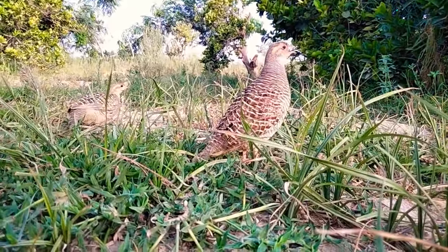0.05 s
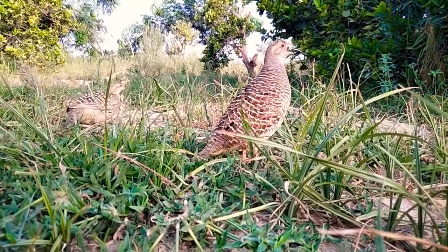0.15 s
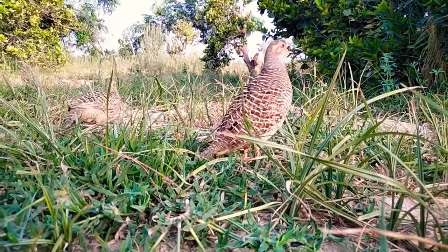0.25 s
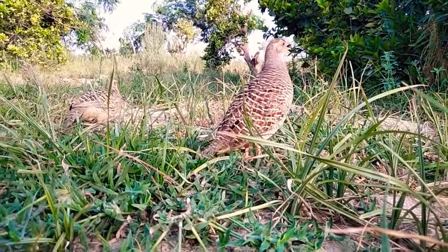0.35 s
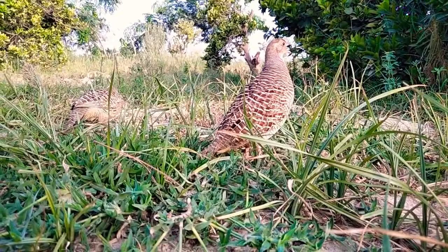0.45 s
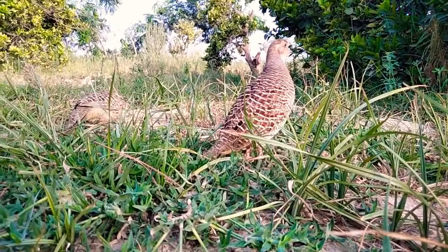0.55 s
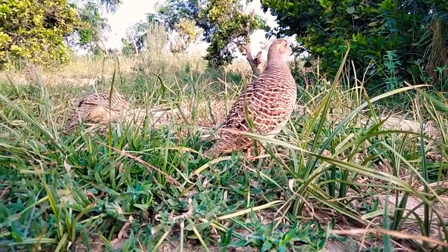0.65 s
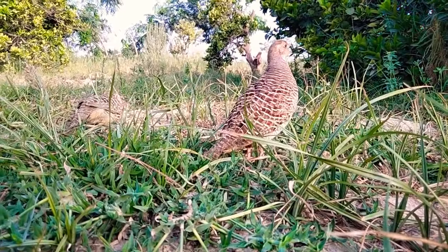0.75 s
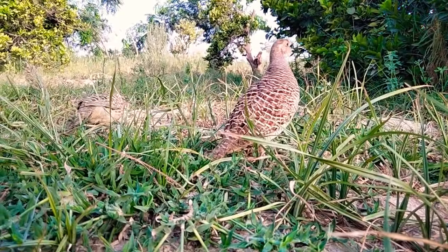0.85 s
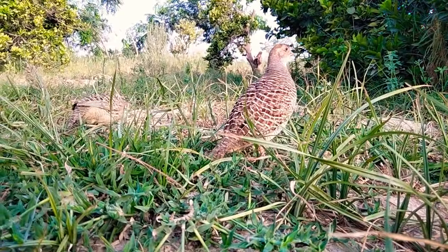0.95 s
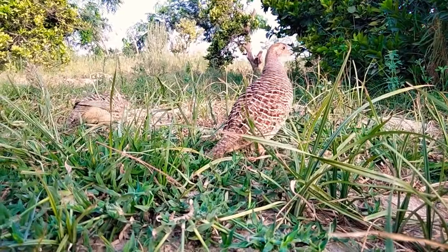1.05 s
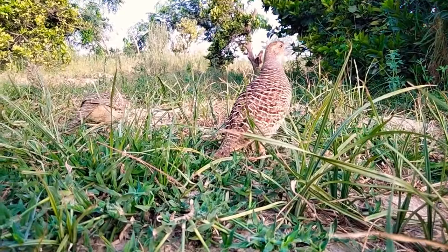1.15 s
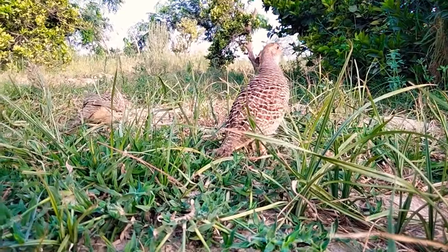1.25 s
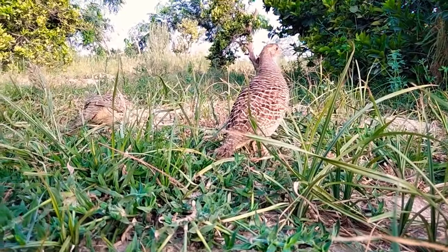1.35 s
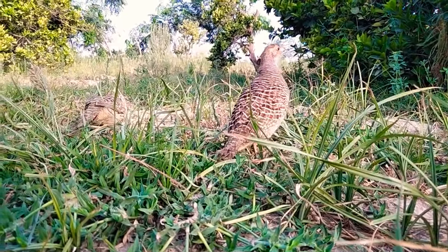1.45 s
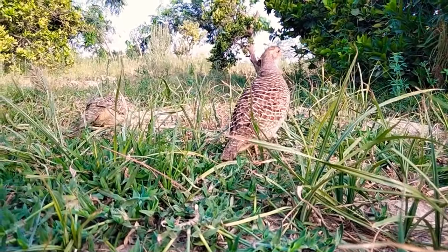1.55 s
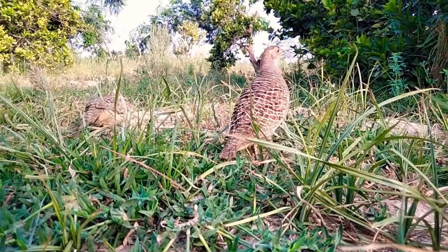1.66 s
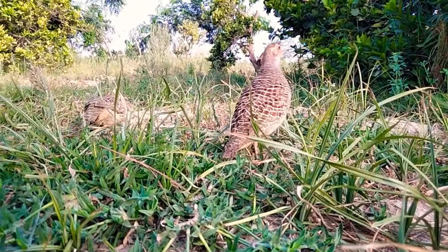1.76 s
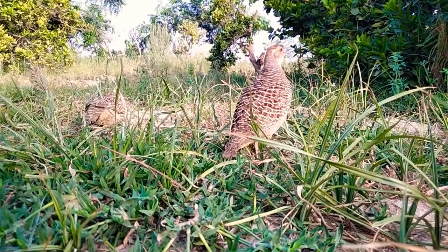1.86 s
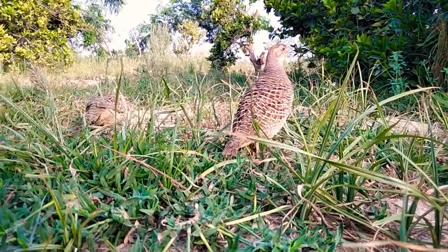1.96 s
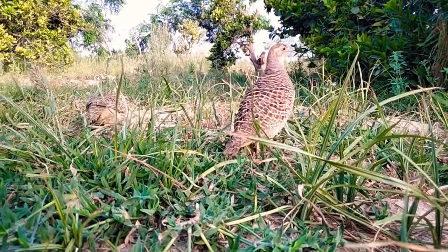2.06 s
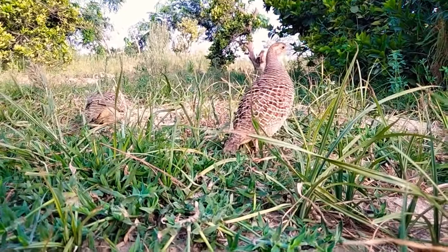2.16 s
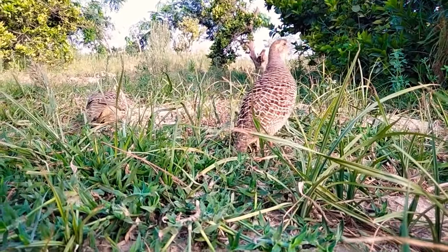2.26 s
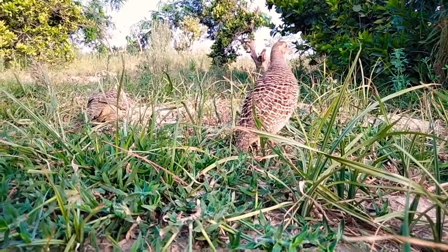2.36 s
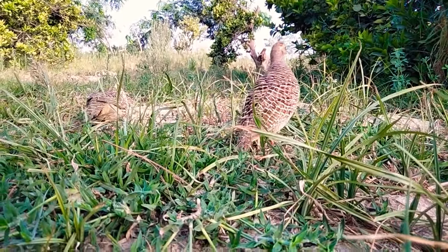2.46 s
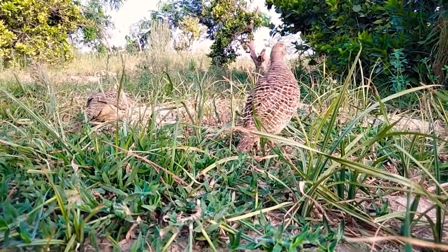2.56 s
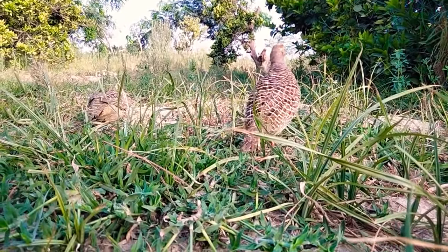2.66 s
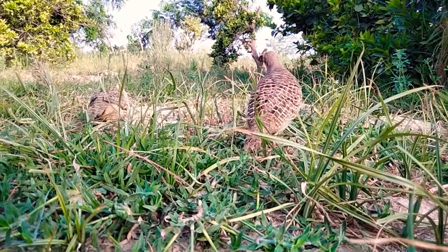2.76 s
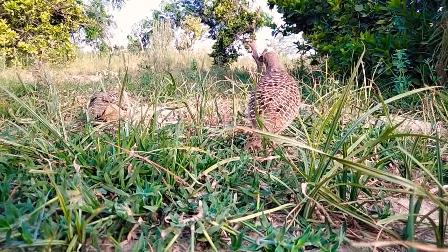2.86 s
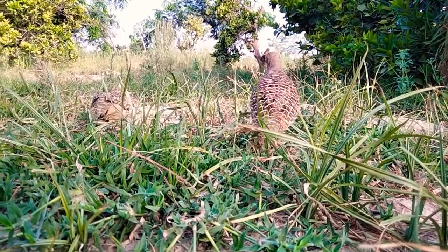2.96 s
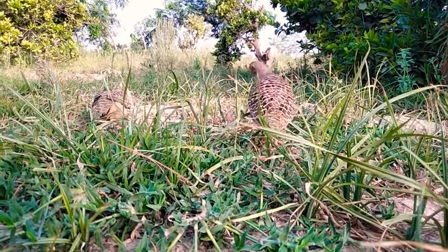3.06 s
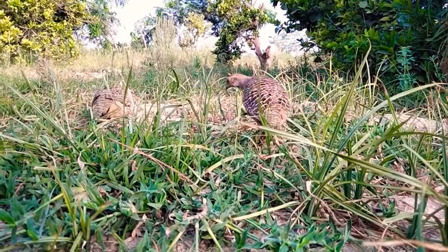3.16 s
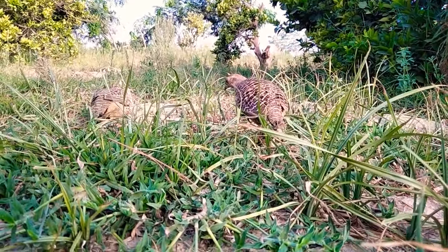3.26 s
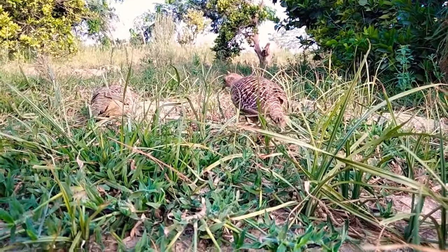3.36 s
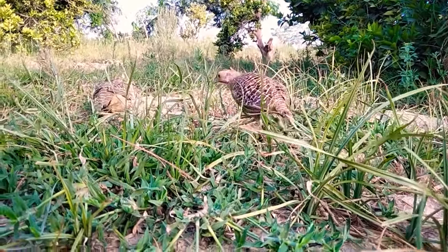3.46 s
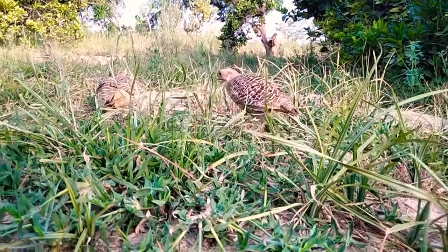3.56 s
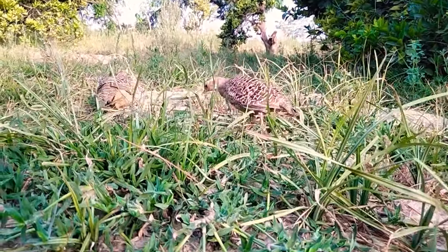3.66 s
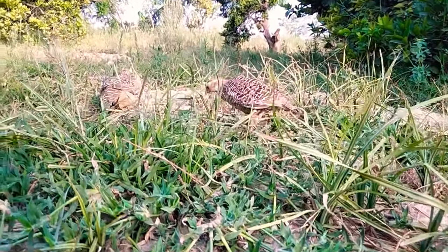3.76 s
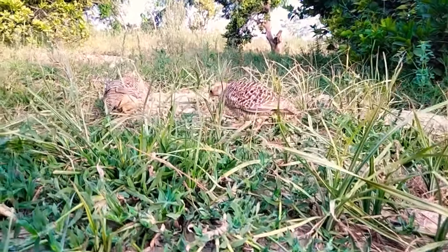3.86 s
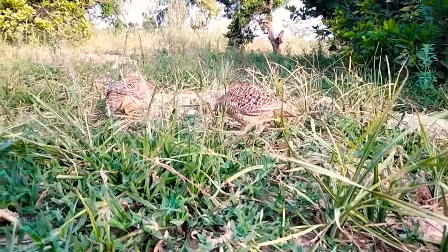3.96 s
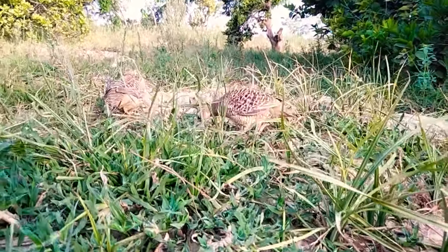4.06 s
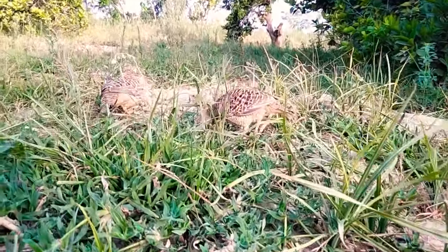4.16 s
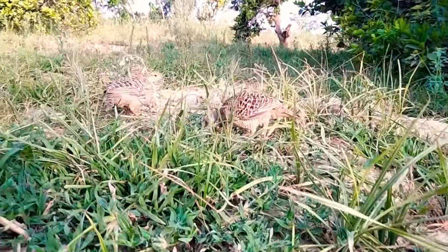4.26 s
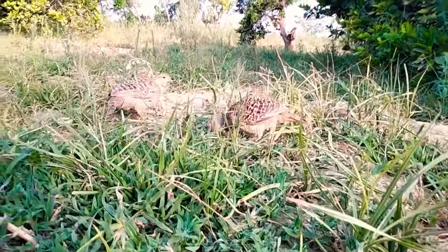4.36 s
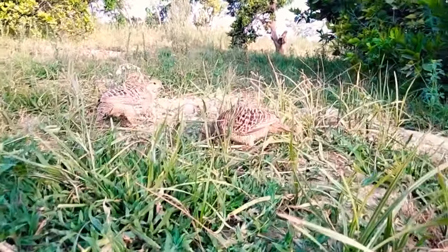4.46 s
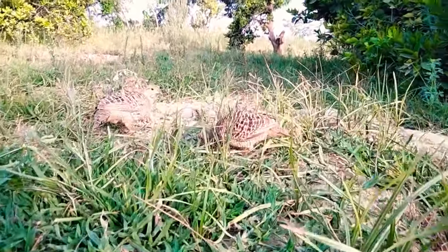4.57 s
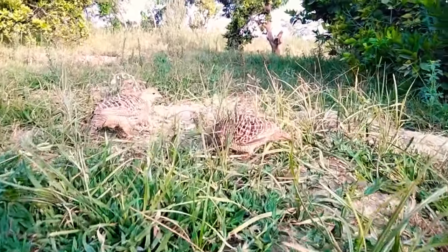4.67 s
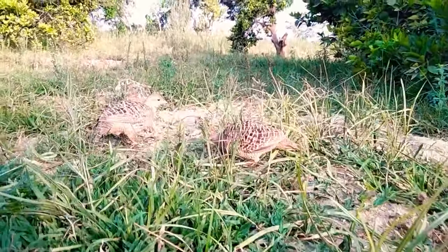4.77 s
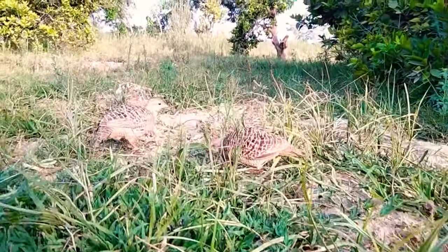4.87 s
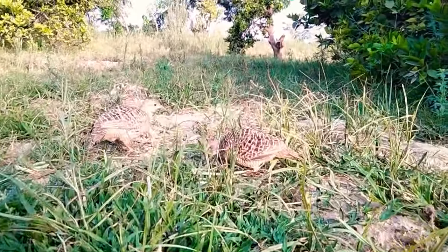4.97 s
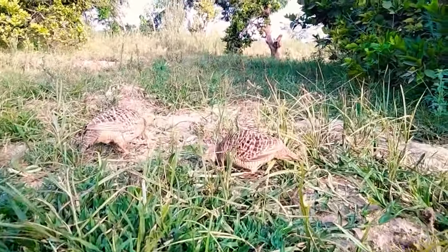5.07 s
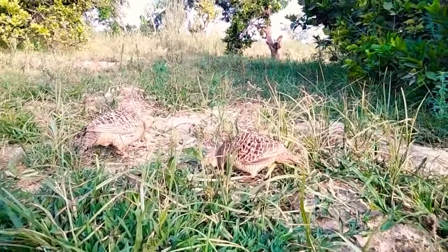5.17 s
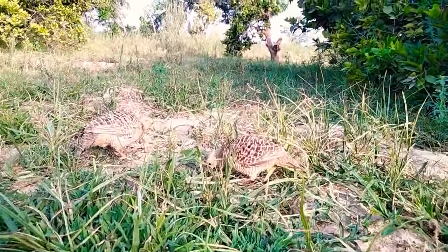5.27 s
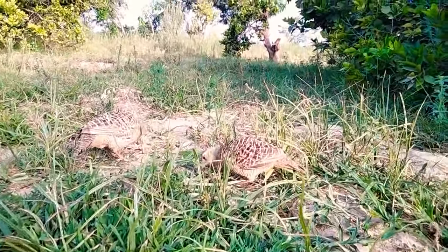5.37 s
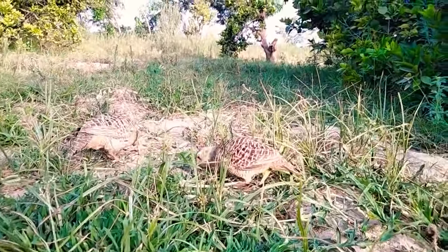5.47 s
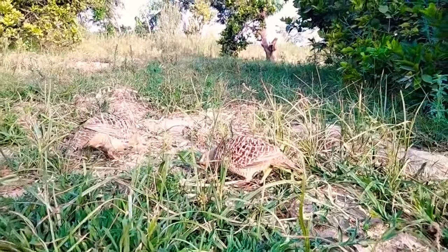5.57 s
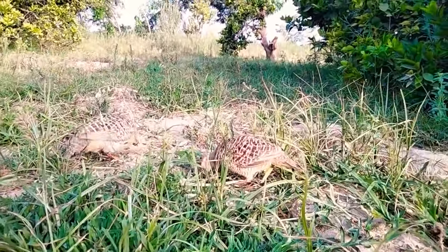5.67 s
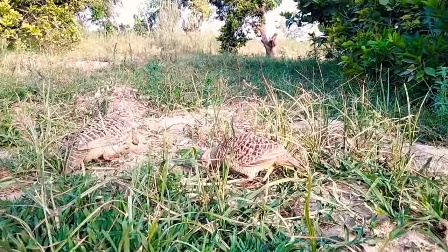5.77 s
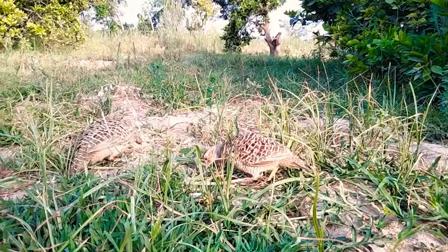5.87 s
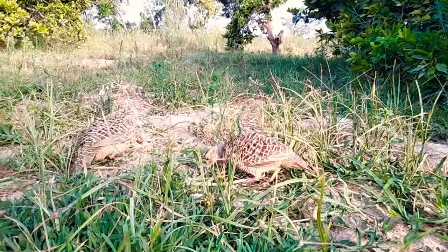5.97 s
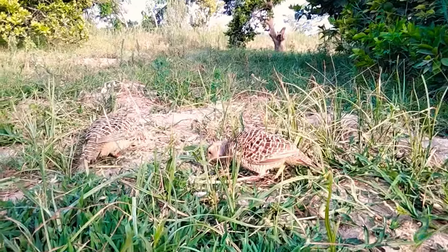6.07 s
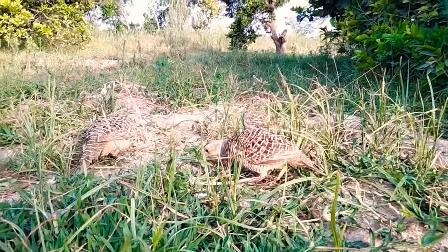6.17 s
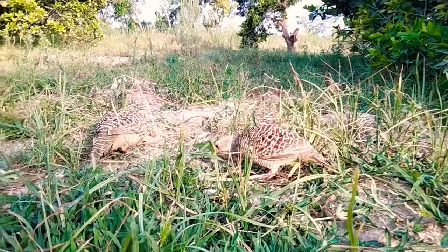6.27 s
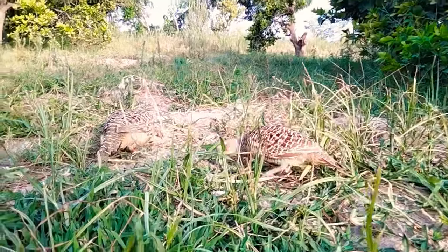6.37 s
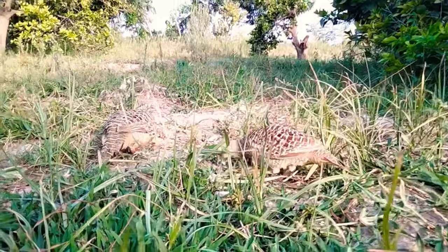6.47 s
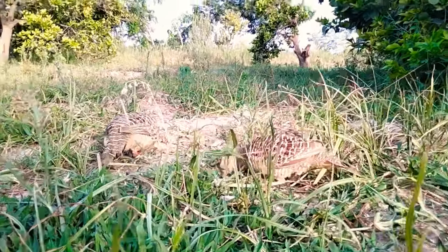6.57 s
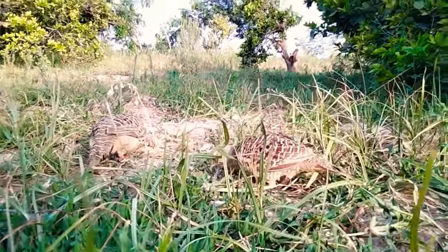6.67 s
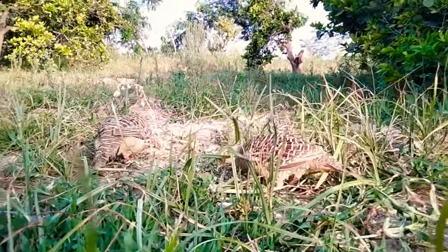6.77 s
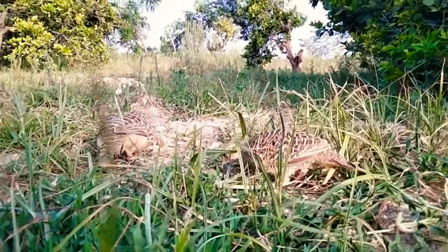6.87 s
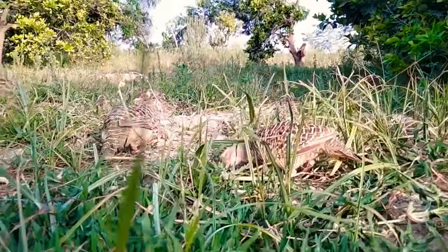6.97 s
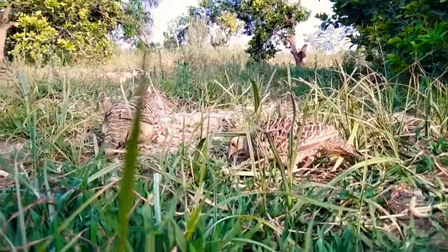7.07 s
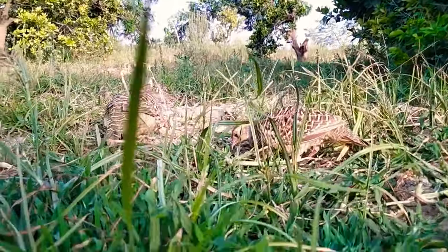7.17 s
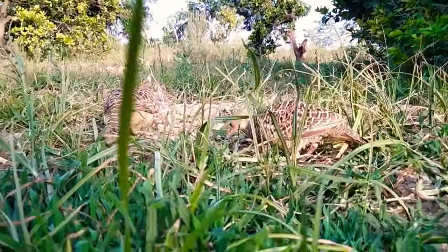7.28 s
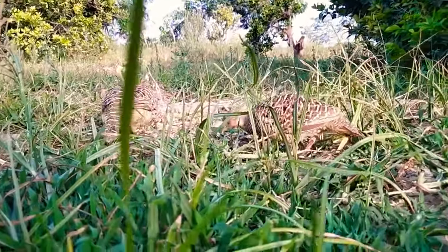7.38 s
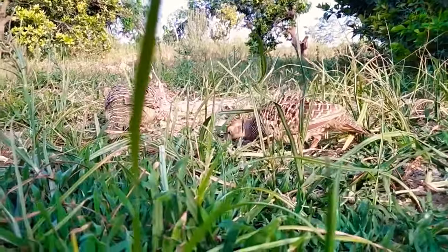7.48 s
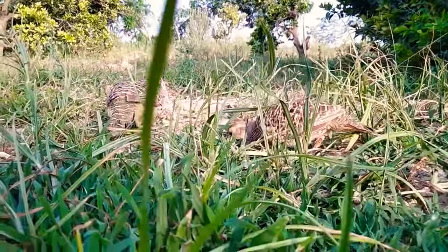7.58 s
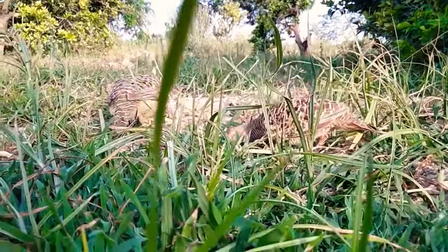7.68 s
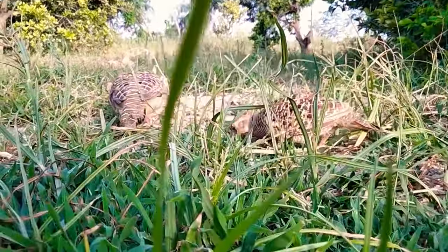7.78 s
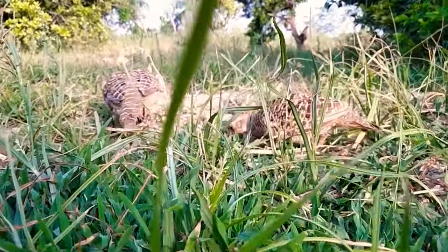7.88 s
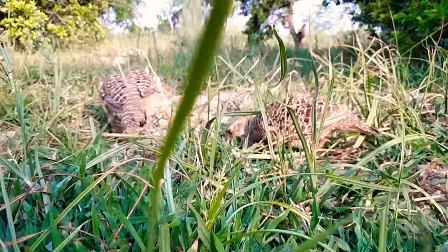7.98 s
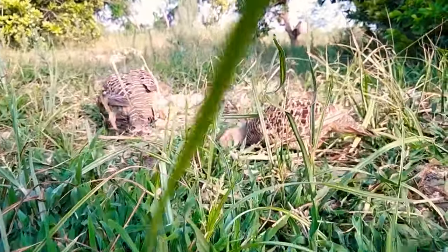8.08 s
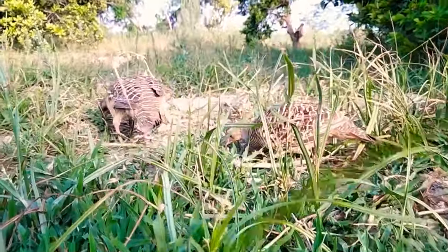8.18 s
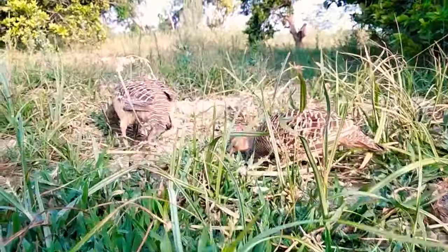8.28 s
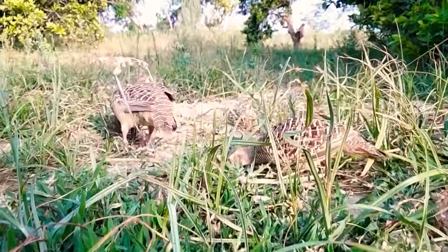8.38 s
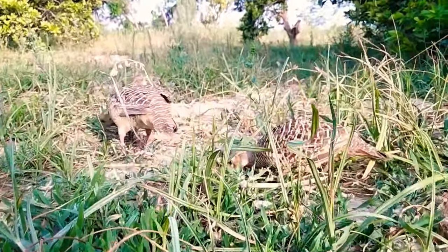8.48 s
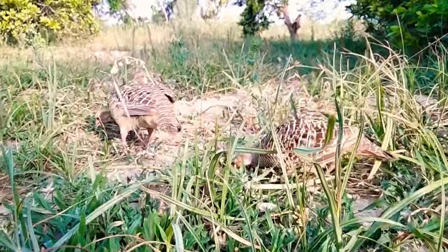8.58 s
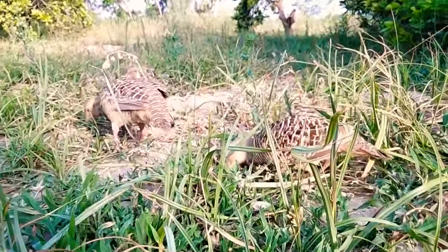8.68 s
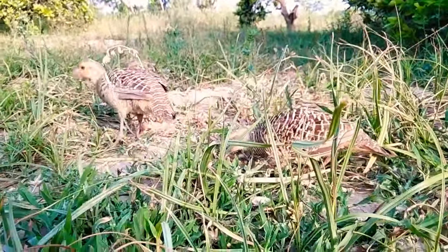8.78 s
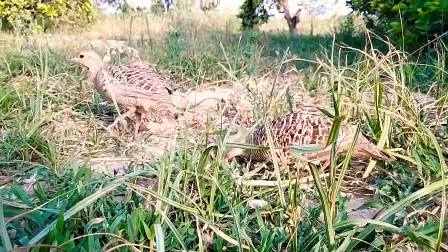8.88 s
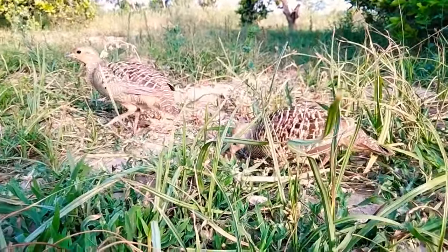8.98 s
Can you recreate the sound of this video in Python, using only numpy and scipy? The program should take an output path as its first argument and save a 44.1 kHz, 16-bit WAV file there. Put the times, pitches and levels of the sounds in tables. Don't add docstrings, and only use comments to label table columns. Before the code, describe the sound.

Loud rasping, ringing bird calls repeat rapidly for under three seconds in grass, then quiet clucks, distant twitters, dry ticks and low traffic rumble.

```python
import sys
import numpy as np
from scipy import signal
from scipy.fft import rfft, irfft, next_fast_len
from scipy.io import wavfile
from scipy.ndimage import uniform_filter1d, minimum_filter1d

SR = 44100
rng = np.random.default_rng(int(sys.argv[2]) if len(sys.argv) > 2 else 0)


def rack_gain(trim_db):
    fader = np.asarray(trim_db, float)
    return 10 ** (fader / 20)


def digitize_waveform(pressure):
    field = np.atleast_2d(pressure).T
    bounded = np.clip(field, -1, 1)
    quanta = np.round(bounded * 32767).astype(np.int16)
    wavfile.write(sys.argv[1], SR, quanta)


N = 397782

# start_s, buzz_s, whistle_s, pitch_ratio, level_db
KI_CALLS = [
    (0, 0.03, 0.035, 1.022, -5),
    (.307, 0.026, 0.041, 1.008, -5),
    (.620, 0.028, 0.04, 1, -5),
    (.931, 0.027, 0.041, 0.99, -5),
    (1.249, 0.027, 0.044, 0.99, -4.5),
    (1.557, 0.028, 0.039, 0.99, -5.5),
    (1.871, 0.033, 0.033, 0.99, -6),
]
# start_s, buzz_s, whistle_s, pitch_ratio, level_db
KO_CALLS = [
    (2.363, .05, .031, 1.0, -4.5),
]
# start_s, rise_s, fall_s, pitch_ratio, level_db
TEE_CALLS = [
    (.101, .021, 0.023, 1, -8),
    (0.412, 0.021, 0.022, 0.98, -8.5),
    (0.727, .020, 0.022, 1.001, -8.5),
]
# start_s, rise_s, fall_s, pitch_ratio, level_db
TAR_CALLS = [
    (1.038, 0.018, 0.029, 0.97, -12),
    (1.355, .018, 0.038, 0.97, -13.5),
    (1.660, 0.018, .035, 0.99, -12.5),
    (1.975, .015, .038, 0.98, -12.5),
    (2.482, .023, 0.033, 0.95, -13.5),
]
# time_s, buzz_hz, level_db
KI_SHAPE = [(0, 566, -20), (.007, 665, -7), (.017, 716, -4.5), (0.022, 751, -10), (0.026, 834, -2),
            (0.047, 801, 0.26), (0.066, 789, -7), (.075, 785, -11), (0.083, 700, -22.5)]
KO_SHAPE = [(0, 519, -20), (.012, 668.7, -8), (.024, 700.6, -4), (0.03, 788, -6.5), (.048, 749.5, -11),
            (.054, 756.2, -3.5), (.076, 748, -3), (.082, 765.7, -28.5), (.095, 800.3, -6)]
TEE_SHAPE = [(0, 525, -27), (.006, 630, -4), (0.014, 760, -3.5), (0.02, 808, 0), (0.033, 718, -1.5),
             (0.041, 644, -1.5), (.046, 635, -30.5), (0.052, 600, -17.5), (.068, 320, -26)]
TAR_SHAPE = [(0, 521.8, -20), (.005, 635.2, 0), (.016, 755.7, -0.5), (0.022, 729.6, 0), (.034, 658, -3.5),
             (.045, 580, -11), (.052, 496.6, -11.5), (0.069, 289.8, -27)]
# odd_multiples_db, off_third_db, half_whistle_db, rasp_db, beak_db_per_octave
KI_STATE = [(-1.5, 3.5, -48, -3, 13.5), (-3, 1.5, -39.5, -16, 25), (-1, 7, -48, -13.5, 7.5),
            (-10, 2, -34, -12.5, 12), (-4, -32, -48, -23, 1.5), (0.5, -47.5, -29.5, -43, 3),
            (1, -48.5, -10, -36.5, 7.5), (-1.5, -22, -2, -3.5, 5.5), (0, -19, -4.5, -2.5, -0.5)]
KO_STATE = [(-3.5, 3.5, -45.5, -2, 12.5), (3.5, 2, -45, -15.5, 12), (-2, 4.5, -39, -15.5, 4.5),
            (-16.5, 1.5, -40, -12, 10), (-20.5, 1, -38, -14.5, 3), (-2, -40.5, -50, -38.5, 4),
            (-5, -50, -41.5, -36, -4.5), (-2, -23, -10, -9, 1.5), (-5, -9, -6, -3, -1.5)]
TEE_STATE = [(-2.5, -1, -28.5, -5, 1), (-11, -2, -24.5, -5, 9.5), (0.5, -5.5, -43, -18.5, 2.5),
             (3.5, -26.5, -42, -34, 11), (9, -49.5, -38.5, -35.5, -12), (18, -46, -54.5, -33.5, -6.5),
             (3.5, -20, -45, -20, -16), (-3.5, -0.5, -40, -10.5, -20.5), (-7, 5.5, -62.5, -8.5, -28.5)]
TAR_STATE = [(-1.5, 0.012, -24, -11, -1.5), (-4, 0.004, -33, -7.5, 6.5), (-9, 0.0046, -40, -15, -8.5),
             (-15.5, 0.0041, -40.5, -24, -4), (-18, 0, -40, -23, -6.5), (-21, 0.0051, -43, -16.5, -13),
             (-11.5, 0.0045, -39.5, -12.5, -34.5), (-5.5, 0.0028, -39.5, -8.5, -30.5)]
KI_STAGES, KO_STAGES, TEE_STAGES, TAR_STAGES = (4, 6), (4, 7), (3, 5), (2, 6)
# freq_hz, level_db
THROAT = [(400, -22), (700, -23.5), (1000, -11), (1500, -22.5), (2000, -1.5), (2600, -3.5), (3700, -8),
          (4300, -12), (4800, -28), (5800, -30.5), (7200, -27), (8200, -30.5), (12000, -39.5),
          (16000, -54.5)]
LOUDEST_DB = -5
PATCHY_DB = 3
HALF_FADE_DB_PER_LINE = .6
KI_TOP_DB, TEE_TOP_DB, TAR_TOP_DB, TOP_DB_PER_S = -0.5, -2.5, -0.5, -3
# time_s, left_minus_right_db
BIRD_PAN = [(0, -0.04), (1.9, -1.5), (2.298, -0.37)]
LEAD_S, LEAD_HZ, LEAD_DB = .011, 880, -34

# freq_hz, left_minus_right_db
PORT_DB = [(500, 0), (1500, -3.5), (2500, -2), (3150, 6), (3500, 2), (4200, -12), (5500, -7), (6200, -11),
           (6950, -28), (7900, -2), (8950, 22), (10300, 8), (11500, -5), (12800, 2), (14300, -9)]
# freq_hz, left_lead_rad
PORT_TURN = [(0, 0), (1000, -1.1), (1700, -1.5), (2750, -1), (3450, 2), (4100, 2.3), (4700, 3.3),
             (5500, 2.5), (6200, .6), (7600, 3), (9000, .3), (9500, -2), (11000, -3.2), (12000, -7.2),
             (14000, -10.8)]
# freq_hz, left_minus_right_db
AROUND_DB = [(500, 0), (2700, -1), (3800, -9), (5500, -8), (7000, -22), (7900, 0), (8950, 27), (11000, 9),
             (16000, -5)]
# freq_hz, level_db
CAVITIES = [(400, -0.5), (6000, 0), (6950, 4), (8150, -4.5), (9300, 5), (11000, -7.5), (12300, 2),
            (13400, -6), (14600, 1.5), (16500, 0)]

# freq_hz, level_db_per_hz
RUMBLE = [(15, -40), (25, -21.5), (97, 3.5), (135, -3), (221, -7), (362, -19.5), (454, -29.5), (600, -39.5),
          (780, -64), (1320, -120)]
# freq_hz, level_db_per_hz
AIR = [(400, -4.5), (1080, -19), (1720, -16.5), (2770, -23), (4090, -26.5), (5800, -34), (7000, -23.5),
       (7980, -42.5), (9360, -24.5), (11000, -33.5), (16000, -36)]
# freq_hz, level_db_per_hz
RUSTLE = [(2500, -16.5), (4000, -1), (5500, -10.5), (6900, 3), (7950, -15), (9300, 0.5), (11000, -10),
          (16000, -14.5)]
# time_s, level_db
RUMBLE_DB = [(0, -58.5), (.2, -52), (2.3, -50.5), (2.7, -47.5), (3.6, -45.5), (6.5, -45.5), (9.02, -45.5)]
# time_s, level_db
AIR_DB = [(2.5, -66.5), (2.7, -67), (3.5, -64), (6.699, -66), (7.4, -66)]
# middle_s, half_length_s, level_db
STIRS = [(3.559, 0.24, -72.5), (4.559, 0.058, -64.5), (4.81, 0.068, -62), (5.792, 0.13, -67),
         (6.661, .1, -65), (7.199, 0.15, -78), (7.83, .03, -70), (8.21, .06, -70), (7.33, 0.046, -73),
         (8.36, .04, -66), (8.915, 0.15, -68)]

# start_s, length_s, from_hz, to_hz, level_db
GLIDES = [(2.592, 0.06, 2060, 1998, -54), (2.679, 0.05, 2100, 2330, -56), (2.72, 0.075, 2345, 2147, -53),
          (2.627, 0.039, 5140, 3300, -53), (2.791, 0.13, 1902, 1390, -58.5),
          (3.009, 0.027, 3590, 3450, -54.5), (3.125, 0.024, 3150, 2250, -55.5),
          (3.14, 0.018, 2300, 2150, -54), (3.148, 0.03, 1750, 1570, -66), (4.151, 0.055, 5980, 3300, -63),
          (4.152, 0.023, 3676, 3590, -47.5), (4.256, 0.013, 3480, 3400, -47),
          (4.263, 0.032, 3350, 1800, -51), (4.226, 0.0098, 3420, 3400, -49.5),
          (4.247, 0.016, 2370, 2250, -56), (4.19, .012, 4600, 4370, -57), (4.22, .012, 4800, 4600, -62),
          (4.192, 0.017, 2380, 2220, -59), (8.557, 0.012, 900, 860, -62.5), (5.274, 0.022, 3110, 3016, -68),
          (5.586, 0.055, 2860, 2503, -71), (6.094, .012, 2706, 2680, -69), (6.183, 0.0121, 1960, 2650, -60),
          (6.2, 0.015, 2730, 2280, -55), (2.622, 0.014, 3420, 5050, -65), (3.431, 0.019, 3800, 1903, -62),
          (3.453, 0.02, 3600, 1800, -63), (3.72, 0.024, 4190, 1900, -65), (3.742, 0.025, 4030, 1800, -57.5),
          (4.006, 0.023, 4250, 1900, -57), (4.035, 0.033, 3900, 1800, -63), (8.4, .08, 2120, 2180, -72),
          (6.03, .07, 3350, 3250, -72), (8.521, 0.074, 2083, 2185, -68), (8.874, 0.072, 3920, 2780, -66.5)]
# start_s, length_s, lowest_hz, level_db, swings_per_s
BRIGHT_WARBLES = [
    (2.754, 0.083, 1750, -65.5, 75),
    (3.274, 0.097, 1764, -63.5, 64),
    (3.566, 0.103, 1692, -64.5, 68),
    (3.859, 0.1134, 1708, -62, 75),
]
# start_s, length_s, level_db, pulses_per_s
TUMBLES = [
    (2.851, 0.097, -61, 50),
    (3.379, 0.056, -59, 53),
    (3.685, 0.089, -65, 55),
    (3.973, 0.081, -68, 73),
]
# start_s, length_s, lowest_from_hz, lowest_to_hz, level_db
WARBLES = [
    (4.598, 0.091, 2245, 2540, -61),
    (4.99, 0.093, 2290, 2520, -59),
    (5.342, 0.11, 2100, 2650, -59),
    (5.693, 0.11, 2146, 2680, -59),
]
# start_s, top_hz, level_db
SWOOPS = [
    (4.705, 3554, -58),
    (5.107, 3500, -57.5),
    (5.461, 3605, -58),
    (5.813, 3470, -57.5),
]
# start_s, length_s, pitch_hz, level_db
PULSED = [
    (3.031, 0.08, 4480, -71.5),
    (3.032, 0.12, 2296, -67),
    (3.047, 0.089, 3140, -68),
]
# start_s, length_s, from_hz, to_hz, level_db
TRILLS = [
    (4.242, 0.27, 1750, 1860, -62.5),
    (4.699, .065, 1800, 1833, -65.5),
    (4.766, 0.24, 1865, 1900, -59),
    (4.78, 0.18, 1490, 1400, -68),
    (6.024, 0.036, 2184, 2020, -63.5),
    (8.749, 0.18, 1752, 1740, -72),
]
# start_s, count, spacing_s, level_db
CHIP_ROWS = [
    (3.409, 19, .0179, -63.5),
    (8.416, 19, .0179, -66),
]
BRIGHT_CLIMB, BRIGHT_OVER_DB = 1.085, 9
PLAIN_SWINGS_PER_S, PLAIN_OVER_DB = 110, -19
SWING_RATIO = .29
TUMBLE_FROM_HZ, TUMBLE_TO_HZ = 4500, 2100
PULSES_PER_S, CYCLES_PER_BUZZ = 40, 18
SWOOP_HOLD_S, SWOOP_FALL_S, SWOOP_TO_HZ, SWOOP_OVER_DB = 0.016, 0.052, 1800, -8
FAR_ATTACK_S, FAR_RELEASE_S = .008, .009
FALL_FADE_POWER = 2
FLAT_DROP_RATIO, UNEVEN_RATIO = .055, .032
FAR_ECHO_DB, FAR_T60_S = -7, .26
TOP_FLICKER_DB = 5.5

# start_s, peak_db, body_db, left_minus_right_db
TICKS = [(3.2928, -47.5, -28, -3.5), (3.624, -50, -31, 0), (3.9434, -53.5, 15.5, -9.5),
         (4.134, -59, -31, 0), (4.195, -53, -28, 1), (4.5085, -40.5, -15.5, 6), (4.7784, -49.5, -25.5, 2),
         (5.317, -55.5, -31, -12), (5.366, -55.5, -20, -3), (5.6878, -53, -25, 7), (5.9008, -51, -26, -3.5),
         (5.9218, -51.5, -2, -13), (6.0161, -50.5, -25, 3), (6.0289, -45.5, -13, 0.5),
         (6.2033, -47.5, -15, -17), (6.6187, -47, -20, 6), (6.686, -57, -23, -7), (6.918, -54.5, -25, 3),
         (7.1024, -49, -25, 0), (7.124, -49, -25.5, -1), (7.3011, -54, -25.5, -6),
         (7.3193, -45, -14.5, -6.5), (7.529, -44, -12, -2.5), (7.5905, -54, -28, 4), (7.6807, -45, -17, -3),
         (7.7396, -56, -22, 2.5), (7.8369, -53, -25, 3), (7.8539, -45, -10.5, 6.5), (8.1717, -52.5, -27, 4),
         (8.2643, -49.5, -4.5, 0.5), (8.2904, -55, -11, -9.5), (8.3263, -54, -25.5, -15.5),
         (8.3377, -50, -26, -8), (8.359, -49, 8.5, -8), (8.3644, -45, 10, -5), (8.7965, -52.5, -17, -2),
         (8.8748, -47.5, -15, -1)]

# start_s, length_s, from_hz, to_hz, level_db
CLUCKS = [
    (3.609, 0.039, 1017, 981, -40),
    (3.893, 0.025, 1168, 1070, -41),
    (4.283, 0.032, 1023, 899, -40.5),
    (5.171, 0.027, 1395, 1350, -48.5),
    (5.684, 0.0106, 1114, 905, -59.5),
    (6.228, 0.041, 1530, 1322, -50.5),
    (7.808, 0.046, 1800, 1592, -50.5),
    (8.684, 0.035, 1459, 1356, -50.5),
]
# start_s, length_s, from_hz, to_hz, level_db
YELPS = [
    (4.212, .017, 1162, 1240, -44.5),
    (4.525, 0.038, 2120, 1906, -42),
]
# time_s, pitch_hz, level_db
SLIDE = [
    (5.885, 1220, -68),
    (5.895, 1440, -49.5),
    (5.915, 993, -36),
    (5.93, 922, -36.5),
    (5.942, 1010, -57),
]
# time_s, pitch_hz, level_db
GROWL = [
    (7.117, 804, -72),
    (7.13, 893, -53),
    (7.155, 652, -40),
    (7.18, 611, -42.5),
    (7.22, 818, -46),
    (7.251, 661.2, -42),
    (7.273, 500, -48),
]
# pitch_hz, overtone_db
CLUCK_OVERTONE = [(600, 2), (790, -8.5), (1700, -22), (1900, -0.5)]
CLUCK_LEAD_DB, CLUCK_MIDDLE_DB, FLICK_DB = -16, -4, -10
SAG_SHARE, FULL_SHARE, FLICK_S, FLICK_RATIO = .35, .75, .007, 1.5
YELP_ATTACK_S, YELP_SCOOP_RATIO, YELP_LEAD_DB = 0.0088, .88, -16
DROP_S, DROP_RATIO, DROP_DB = 0.018, 0.38, -17

# time_s, pitch_hz, level_db, buzz_depth_rad
HOOK = [
    (6.195, 2100, -56, 0.53),
    (6.203, 2296, -43, 0.82),
    (6.214, 2140, -43, 0.45),
    (6.227, 1840, -59, .1),
    (6.24, 2090, -48, .1),
    (6.248, 2210, -68, .1),
]
# time_s, pitch_hz, level_db, buzz_depth_rad
HELD = [
    (6.338, 2004, -69.5, .05),
    (6.355, 2036, -48, .05),
    (6.38, 2100, -41.5, 0.042),
    (6.407, 2047, -47, 0.59),
    (6.44, 2003, -54, 0.94),
    (6.466, 2060, -46, 0.59),
    (6.495, 2184, -48.5, 0.41),
    (6.52, 2090, -47.5, 0.88),
    (6.534, 1990, -59, 0.91),
]
# time_s, pitch_hz, level_db, buzz_depth_rad
FALL = [
    (6.544, 2260, -59, .05),
    (6.553, 2340, -42.5, .05),
    (6.574, 2130, -47, .05),
    (6.602, 1786, -52, .05),
    (6.646, 1373, -63.5, .05),
    (6.665, 1310, -70, .05),
]
CYCLES_PER_SPLIT, WHISTLER_ECHO_DB = 14, -4

# start_s, level_db
THUMPS = [
    (6.358, -21),
    (6.515, -28),
    (8.869, -38),
]
SNAP_S, SNAP_HZ, SNAP_DB = 8.358, (600, 1350, 2548, 4299), -29
LIMIT, LIMIT_S = .79, .003


def colour(hz, table):
    table = np.array(table)
    return np.interp(np.log(np.maximum(hz, 1)), np.log(table[:, 0]), table[:, 1], left=-70)


def shaped(x, table):
    gain = rack_gain(colour(np.fft.rfftfreq(len(x), 1 / SR), table))
    y = irfft(rfft(x) * gain, len(x))
    return y / np.sqrt(np.mean(y ** 2))


def walk(rate_hz, size=N):
    k = int(SR / rate_hz)
    steps = np.repeat(rng.standard_normal(size // k + 4), k)
    y = uniform_filter1d(uniform_filter1d(steps, k), k)
    return y[:size] / y.std()


def unfold(rows, fade_s=0.00067):
    s, *columns = np.transpose(rows)
    t = np.arange(int(s[0] * SR), int(s[-1] * SR)) / SR
    fade = np.clip(np.minimum(t - s[0], s[-1] - t) / fade_s, 0, 1)
    return int(s[0] * SR), fade, [np.interp(t, s, c) for c in columns]


def add(out, start, x):
    out[..., start:start + x.shape[-1]] += x[..., :out.shape[-1] - start]


def syllable(shape, state, stages, start_s, first_s, second_s, pitch_ratio, level_db):
    rows = np.hstack([shape, state])
    a, b, end = rows[[*stages, -1], 0]
    at_s = np.interp(rows[:, 0], [0, a, b, end], np.cumsum([start_s, first_s, second_s, end - b]))
    return np.column_stack([at_s, pitch_ratio * rows[:, 1], level_db + rows[:, 2], rows[:, 3:]])


def syrinx_lines(k, hz, odd_db, third_db, half_db, open_db, top_db):
    line_hz = k * hz / 2
    whole_db = (k % 4 == 2) * odd_db + (k % 6 != 0) * third_db
    between_db = half_db - HALF_FADE_DB_PER_LINE * np.maximum(k - 9, 0)
    line_db = np.where(k % 2 == 0, whole_db, np.where(k % 3 == 0, between_db, -90))
    beak_db = open_db * np.clip(np.log2(line_hz / 2500), 0, .75)
    beak_db = beak_db + top_db * (line_hz > 5200)
    loose = np.clip(1 + np.minimum(odd_db, third_db) / 25, .15, 1)
    patches = rng.standard_normal((len(k), len(hz) // 256 + 1)).repeat(256, axis=1)
    patches = uniform_filter1d(patches, size=256)[:, :len(hz)]
    patch_db = PATCHY_DB * np.sqrt(k / 6) * loose * patches
    return rack_gain(line_db + beak_db + patch_db + colour(line_hz, THROAT)) * (line_hz < 16000)


def francolin():
    out = np.zeros(N)
    breath = shaped(rng.standard_normal(N), THROAT)
    wobble = walk(900)
    k = np.arange(1, 51)[:, None]
    kinds = ((KI_CALLS, KI_TOP_DB, KI_SHAPE, KI_STATE, KI_STAGES),
             (KO_CALLS, KI_TOP_DB, KO_SHAPE, KO_STATE, KO_STAGES),
             (TEE_CALLS, TEE_TOP_DB, TEE_SHAPE, TEE_STATE, TEE_STAGES),
             (TAR_CALLS, TAR_TOP_DB, TAR_SHAPE, TAR_STATE, TAR_STAGES))
    for calls, top_db, *kind in kinds:
        for call in calls:
            start, fade, columns = unfold(syllable(*kind, *call), 0.004)
            hz, level_db, odd_db, third_db, half_db, rasp_db, open_db = columns
            span = slice(start, start + len(hz))
            hz = hz * (1 + 0.15 * rack_gain(rasp_db) * wobble[span])
            turn = np.pi * np.cumsum(hz) / SR
            away_db = top_db + TOP_DB_PER_S * call[0]
            lines = syrinx_lines(k, hz, odd_db, third_db, half_db, open_db, away_db)
            tone = np.sum(lines * np.sin(k * turn + 0.23 * k ** 2), axis=0)
            tone /= np.sqrt(np.sum(lines ** 2, axis=0) / 2)
            rasp = rack_gain(rasp_db) * breath[span] * (1 + 0.27 * np.cos(2 * turn))
            level = uniform_filter1d(rack_gain(np.minimum(level_db, LOUDEST_DB)), size=150)
            add(out, start, fade * level * (tone + rasp) / np.sqrt(1 + rack_gain(2 * rasp_db)))
    return out


def ground():
    t = np.arange(N) / SR
    mid, side = (shaped(rng.standard_normal(N), RUMBLE) for _ in range(2))
    rumble = (mid + rack_gain(-11.5) * side * np.array([[1], [-1]])) * rack_gain(1.4 * walk(9))

    air = np.array([shaped(rng.standard_normal(N), AIR) for _ in range(2)]) * rack_gain(2.0 * walk(5.5))
    high = signal.sosfilt(signal.butter(2, 5000, "high", fs=SR, output="sos"), air)
    air = air + high * (rack_gain(-4.0 + TOP_FLICKER_DB * walk(28)) - 1)

    grit = rack_gain(2.6 * rng.exponential(size=N // 60 + 1)).repeat(60)[:N]
    rustle = np.array([shaped(rng.standard_normal(N) * grit, RUSTLE) for _ in range(2)])
    stirs = sum(rack_gain(db) * np.exp(-((t - middle_s) / half_s) ** 4) for middle_s, half_s, db in STIRS)
    rustle *= rack_gain(2.0 * walk(22)) * (rack_gain(-80.5 + 4.0 * walk(8.0)) + stirs)

    layers = ((rumble, RUMBLE_DB), (air, AIR_DB))
    return rustle + sum(x * rack_gain(np.interp(t, *np.transpose(level))) for x, level in layers)


def leads():
    out, t = np.zeros(N), np.arange(int(LEAD_S * SR)) / SR
    for start_s, *_, pitch_ratio, _ in TEE_CALLS + TAR_CALLS:
        turn = 2 * np.pi * pitch_ratio * LEAD_HZ * t * (1 + 6.5 * t)
        note = np.sin(turn) * np.sin(np.pi * t / LEAD_S)
        add(out, int((start_s - 0.41 * LEAD_S) * SR), rack_gain(LEAD_DB) * note)
    return out


def whistle(start_s, length_s, from_hz, to_hz, level_db, bend=0, swell=1, over_db=-60):
    t = np.arange(int(length_s * SR)) / SR
    flutter = np.tanh(walk(148.7, size=len(t)))
    lag = rng.standard_normal() * np.array([[.4], [-.4]])
    hz = from_hz * (to_hz / from_hz) ** (t / length_s) * (1 + bend * np.ones(len(t)) + 0.023 * flutter)
    turn = 2 * np.pi * np.cumsum(hz) / SR + lag
    tone = np.sin(turn) + rack_gain(over_db) * (np.sin(2 * turn) + rack_gain(-14.0) * np.sin(3 * turn))
    attack = t / min(FAR_ATTACK_S, length_s / 4)
    release = (length_s - t) / min(FAR_RELEASE_S, length_s / 2)
    edges = np.clip(np.minimum(attack, release), 0, 1)
    fall = min(to_hz / from_hz, 1) ** (FALL_FADE_POWER * t / length_s)
    return int(start_s * SR), rack_gain(level_db + 7.5 + 2.3 * flutter) * edges * swell * fall * tone


def warble(start_s, length_s, from_hz, to_hz, level_db, swings_per_s, over_db):
    t = np.arange(int(length_s * SR)) / SR
    top = np.sin(np.pi * (swings_per_s * t + 0.1)) ** 4
    return whistle(start_s, length_s, from_hz, to_hz, level_db, bend=SWING_RATIO * top,
                   swell=rack_gain(-6.5 * np.sqrt(top)), over_db=over_db)


def trill(start_s, length_s, from_hz, to_hz, level_db, pulses_per_s):
    beat = 2 * np.pi * pulses_per_s * np.arange(int(length_s * SR)) / SR
    drop = FLAT_DROP_RATIO / (1 + (pulses_per_s > 50)) + 0.224 * abs(np.log(to_hz / from_hz))
    scatter = UNEVEN_RATIO * (pulses_per_s > 60) * walk(pulses_per_s, size=len(beat))
    swell = (1 - 0.88 * np.cos(beat)) ** (1 + (pulses_per_s < 50))
    return whistle(start_s, length_s, from_hz, to_hz, level_db, bend=drop * np.sin(beat) + scatter, swell=swell)


def swoop(start_s, top_hz, level_db):
    length_s = SWOOP_HOLD_S + SWOOP_FALL_S
    t = np.arange(int(length_s * SR)) / SR
    down = np.sin(np.pi / 2 * np.clip((t - SWOOP_HOLD_S) / SWOOP_FALL_S, 0, 1))
    ripple = 1 + 0.059 * down * np.sin(150 * np.pi * t)
    bend = (SWOOP_TO_HZ / top_hz) ** down * ripple - 1
    return whistle(start_s, length_s, top_hz, top_hz, level_db, bend=bend, over_db=SWOOP_OVER_DB - 28 * down)


def far_birds():
    out = np.zeros((2, N))
    notes = [whistle(*row) for row in GLIDES]
    for s, d, hz, db, swings in BRIGHT_WARBLES:
        notes.append(warble(s, d, hz, BRIGHT_CLIMB * hz, db, swings, BRIGHT_OVER_DB))
    notes += [trill(s, d, TUMBLE_FROM_HZ, TUMBLE_TO_HZ, db, pulses) for s, d, db, pulses in TUMBLES]
    notes += [trill(s, d, hz, hz, db, PULSES_PER_S) for s, d, hz, db in PULSED]
    for s, count, spacing_s, db in CHIP_ROWS:
        notes += [whistle(s + n * spacing_s, 0.006, 4590, 8350, db - 3.0) for n in range(int(count))]
    notes += [trill(*row, (row[2] + row[3]) / 2 / CYCLES_PER_BUZZ) for row in TRILLS]
    notes += [warble(*row, PLAIN_SWINGS_PER_S, PLAIN_OVER_DB) for row in WARBLES]
    for s, hz, db in SWOOPS:
        notes.append(whistle(s - .008, 0.0073, 0.62 * hz, hz, db - 2.5, over_db=SWOOP_OVER_DB))
        notes.append(swoop(s, hz, db))
    for note in notes:
        add(out, *note)
    return out


def ticks():
    out, t = np.zeros((2, N)), np.arange(int(0.036 * SR)) / SR
    body_band = signal.butter(2, [700, 3500], "band", fs=SR, output="sos")
    for start_s, peak_db, body_db, pan_db in TICKS:
        noise = rng.standard_normal((2, 2, len(t)))
        crack = np.array([shaped(n, RUSTLE) for n in noise[0]])
        crack = crack * np.exp(-t / 0.0034) * (1 - np.exp(-t / 0.0011))
        body = signal.sosfilt(body_band, noise[1]) * np.exp(-t / 0.0014)
        sides = rack_gain(np.array([[pan_db], [-pan_db]]) / 2)
        sides = sides / np.sqrt(np.mean(sides ** 2))
        add(out, int(start_s * SR), rack_gain(peak_db + 1.5) * (crack * sides + rack_gain(body_db + 14.0) * body))
    return out


def cluck_paths():
    paths = [SLIDE, GROWL]
    for s, d, a, b, db in CLUCKS:
        paths.append([(s, a, db + CLUCK_LEAD_DB), (s + SAG_SHARE * d, a, db + CLUCK_MIDDLE_DB),
                      (s + FULL_SHARE * d, b, db), (s + d, b, db),
                      (s + d + FLICK_S, FLICK_RATIO * b, db + FLICK_DB)])
    for s, d, a, b, db in YELPS:
        paths.append([(s, YELP_SCOOP_RATIO * a, db + YELP_LEAD_DB), (s + YELP_ATTACK_S, a, db),
                      (s + d, b, db), (s + d + DROP_S, DROP_RATIO * b, db + DROP_DB)])
    return paths


def clucks():
    out = np.zeros(N)
    for rows in cluck_paths():
        start, fade, (hz, level_db) = unfold(rows)
        over_db = colour(np.maximum(hz, 610), CLUCK_OVERTONE)
        over = rack_gain(over_db + .5 * (level_db - level_db.max()))
        rough = over * (hz < 700)
        turn = 2 * np.pi * np.cumsum(hz * (1 + 0.114 * rough * walk(460, size=len(hz)))) / SR
        tone = np.sin(turn) + over * (np.sin(2 * turn) + rack_gain(-26.0) * np.sin(3 * turn))
        tone *= 1 + 0.25 * rough * np.sin(turn / 2)
        scratch = shaped(rng.standard_normal(len(hz)), [(500, -5.5), (1400, 6.5), (4000, -23.5)])
        tone += .5 * over * (hz < 660) * scratch
        add(out, start, np.sqrt(2) * fade * rack_gain(level_db) * tone)
    return out


def whistler():
    out = np.zeros(N)
    for rows in (HOOK, HELD, FALL):
        start, fade, (hz, level_db, depth_rad) = unfold(rows)
        turn = 2 * np.pi * np.cumsum(hz) / SR
        slow = turn / CYCLES_PER_SPLIT + 1.1 * walk(202, size=len(hz))
        add(out, start, np.sqrt(2) * fade * rack_gain(level_db) * np.sin(turn + depth_rad * np.sin(slow)))
    return out


def wind():
    out, t = np.zeros((2, N)), np.arange(int(.08 * SR)) / SR
    knock = np.sin(2 * np.pi * 66 * t) * np.exp(-t / 0.013) * (1 - np.exp(-t / 0.0018))
    for start_s, level_db in THUMPS:
        add(out, int(start_s * SR), rack_gain(level_db) * np.array([[2.2], [.4]]) * knock)
    return out


def snap():
    out, t = np.zeros(N), np.arange(int(.05 * SR)) / SR
    burst = rng.standard_normal(len(t)) * (t / .006) * np.exp(1 - t / 0.0071)
    ring = np.zeros(len(t))
    for hz in SNAP_HZ:
        band = signal.butter(1, [0.862 * hz, 1.12 * hz], "band", fs=SR, output="sos")
        ring += signal.sosfilt(band, burst)
    add(out, int((SNAP_S - .003) * SR), rack_gain(SNAP_DB) * ring / abs(ring).max())
    return out


def bushes(x, t60_s, wet_db, first_s=0.003):
    t = np.arange(int(.5 * SR)) / SR
    echo = rng.standard_normal((2, len(t))) * rack_gain(-60 * t / t60_s) * (t > first_s)
    echo *= rack_gain(wet_db) / np.sqrt(np.sum(echo[0] ** 2))
    return signal.fftconvolve(x[None], echo, axes=1)[:, :N]


def ports(x, balance, turn=((0, 0), (1, 0)), rings=((1, 0), (SR, 0))):
    size = next_fast_len(N + 4096)
    hz = np.fft.rfftfreq(size, 1 / SR)
    floor_hz = np.maximum(hz, 600)
    half = rack_gain(colour(floor_hz, balance) / 2) * np.exp(.5j * np.interp(hz, *np.transpose(turn)))
    norm = np.sqrt((abs(half) ** 2 + abs(half) ** -2) / 2) / rack_gain(colour(floor_hz, rings))
    return irfft(rfft(x, size) * np.array([half, 1 / half]) / norm, size)[:, :N]


def scene():
    bird = francolin() + leads() + clucks()
    far, clear = far_birds()[0], whistler()
    pan_db = np.interp(np.arange(N) / SR, *np.transpose(BIRD_PAN))
    near = ports(bird + rack_gain(-1.0) * far + clear, PORT_DB, PORT_TURN, CAVITIES)
    near = near * rack_gain(np.array([pan_db, -pan_db]) / 2)
    dull = signal.sosfilt(signal.butter(1, [1700, 2900], "band", fs=SR, output="sos"), bird)
    echo = bushes(dull, t60_s=0.2, wet_db=-32, first_s=.006)
    echo = echo + bushes(dull, t60_s=0.3, wet_db=-41, first_s=0.03)
    distant = far + rack_gain(WHISTLER_ECHO_DB) * clear
    echo = echo + bushes(distant, t60_s=FAR_T60_S, wet_db=FAR_ECHO_DB, first_s=.012)
    return near + ports(echo + ticks() + snap() + ground(), AROUND_DB) + wind()


def low_pass(x):
    return signal.sosfilt(signal.butter(12, 15960, fs=SR, output="sos"), x)


def record(dry):
    x, reach = rack_gain(1.0) * dry, int(LIMIT_S * SR)
    gain = LIMIT / np.maximum(abs(x).max(axis=0), LIMIT)
    gain = uniform_filter1d(minimum_filter1d(gain, size=2 * reach), size=reach)
    return low_pass(gain * x)


dry = scene()
out = record(dry)
digitize_waveform(out)
```